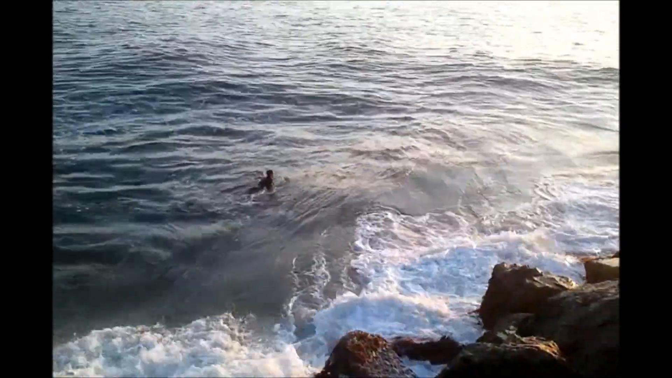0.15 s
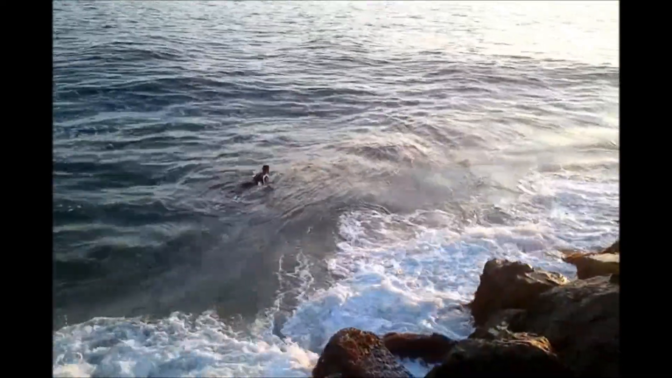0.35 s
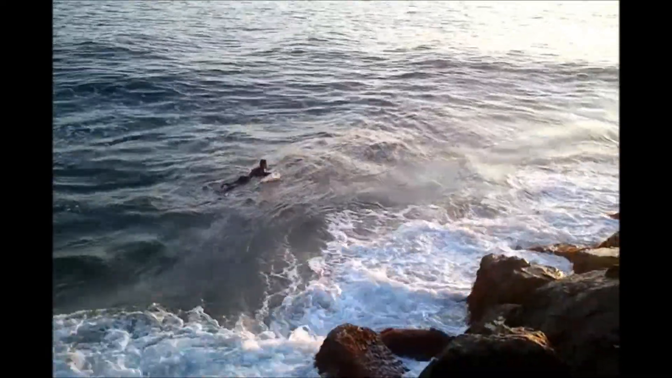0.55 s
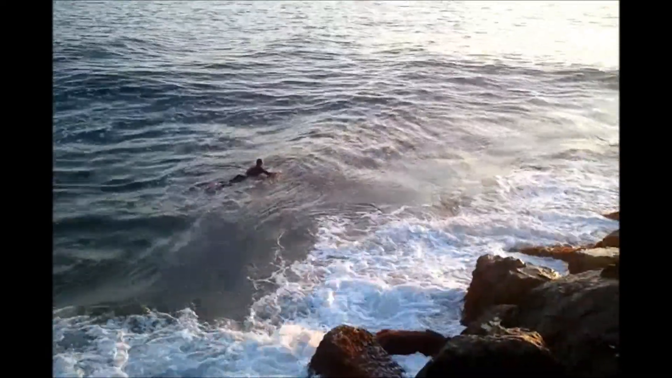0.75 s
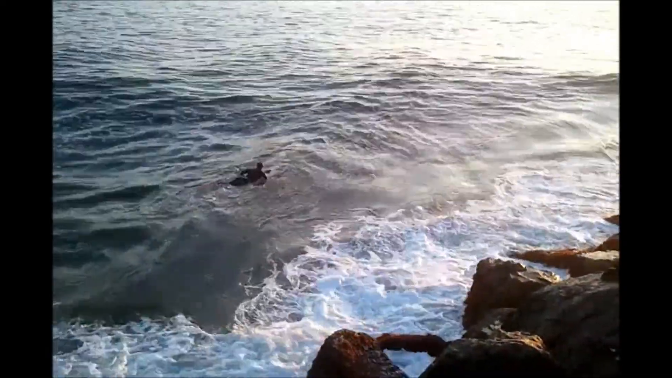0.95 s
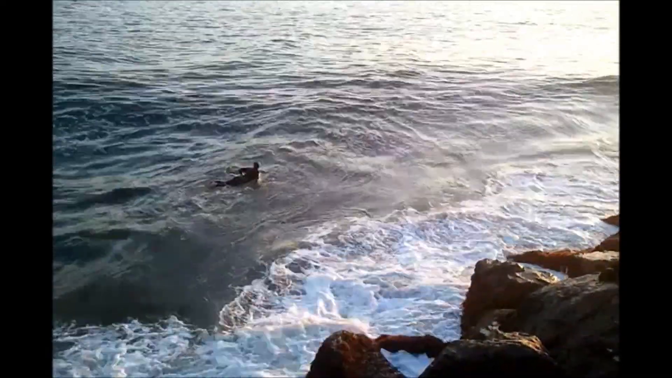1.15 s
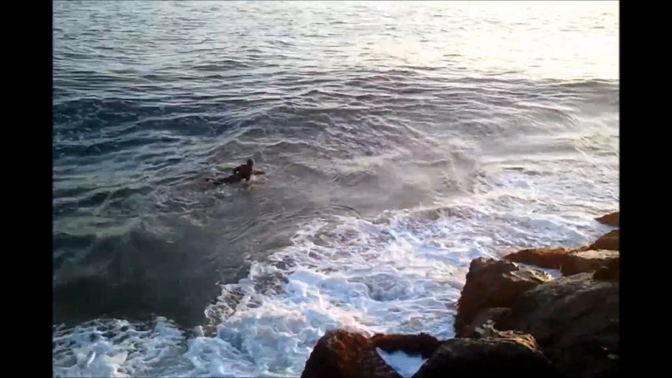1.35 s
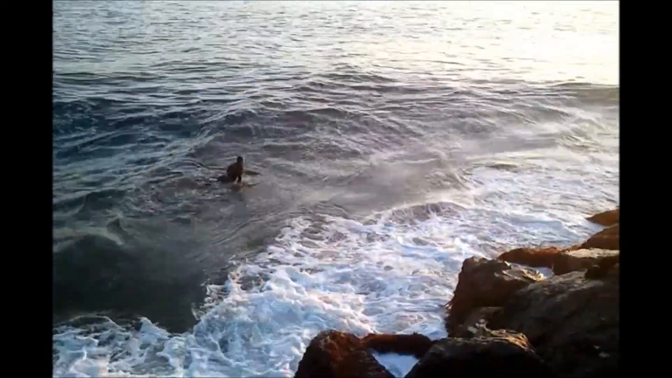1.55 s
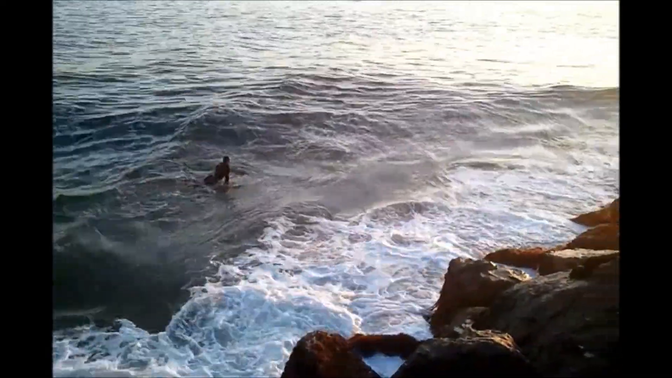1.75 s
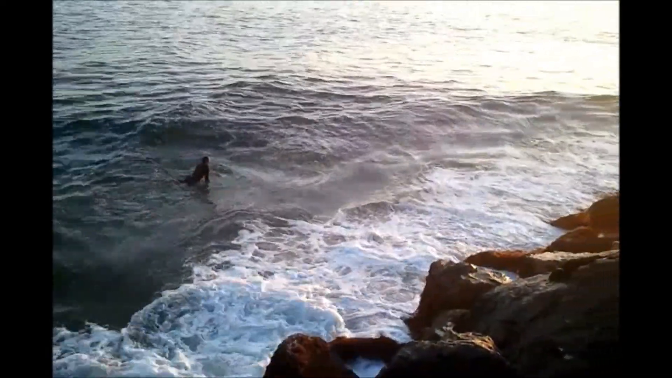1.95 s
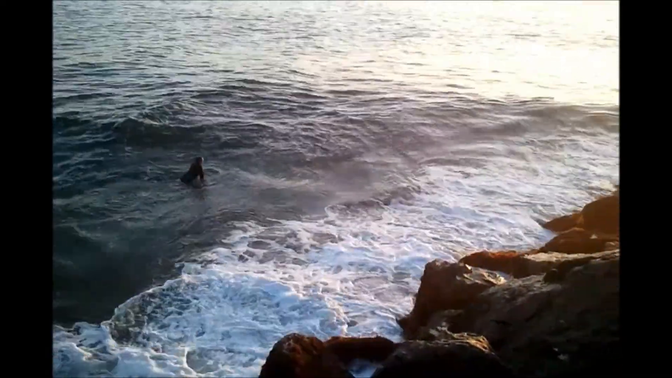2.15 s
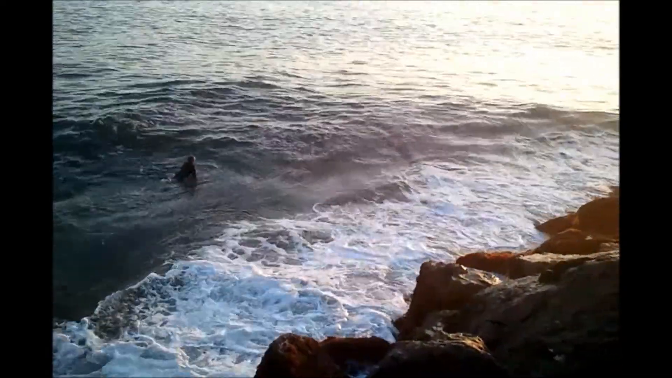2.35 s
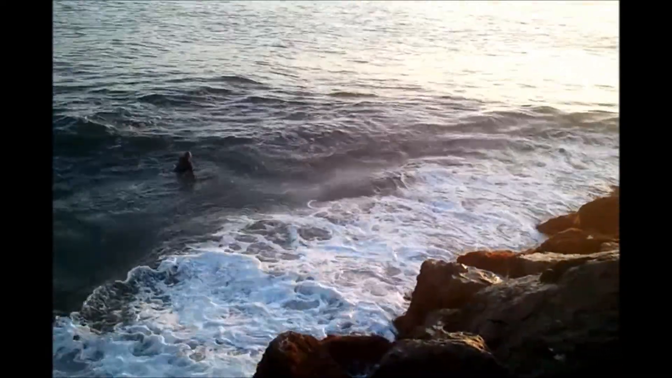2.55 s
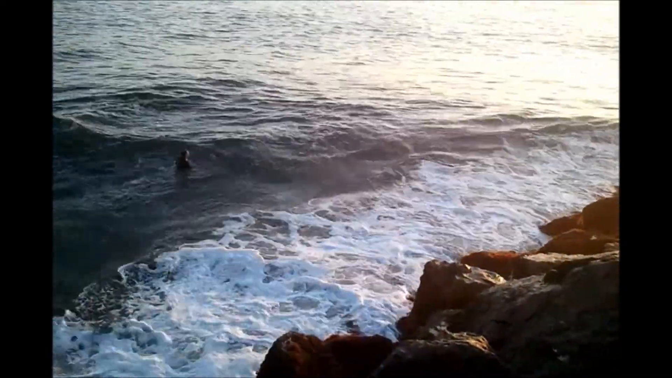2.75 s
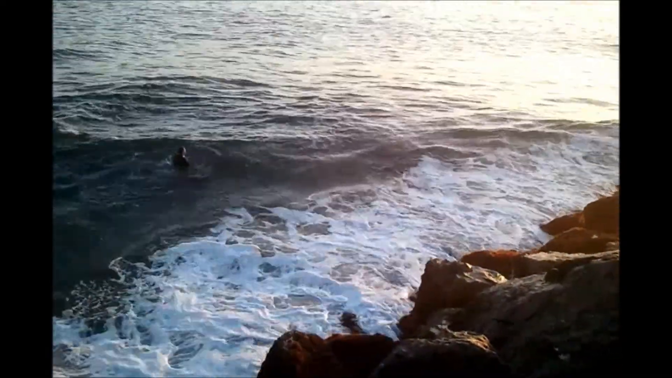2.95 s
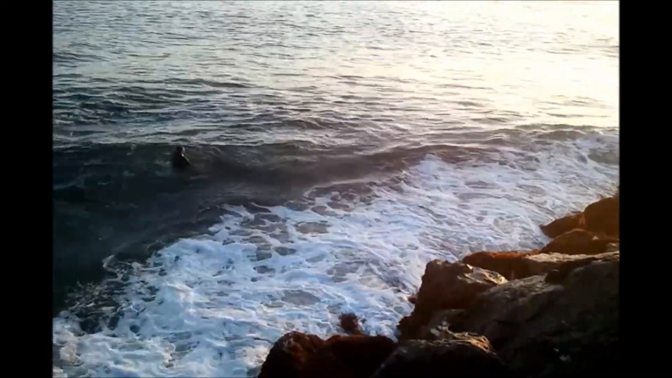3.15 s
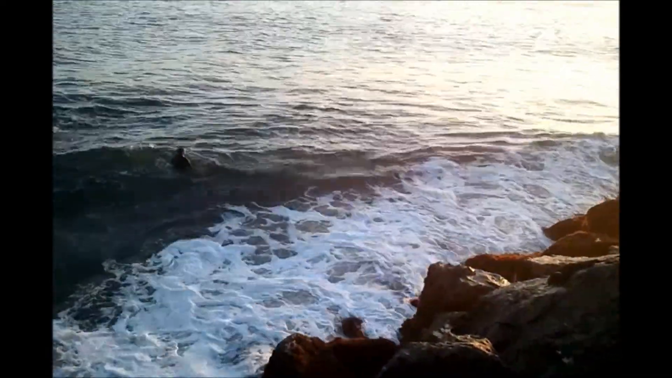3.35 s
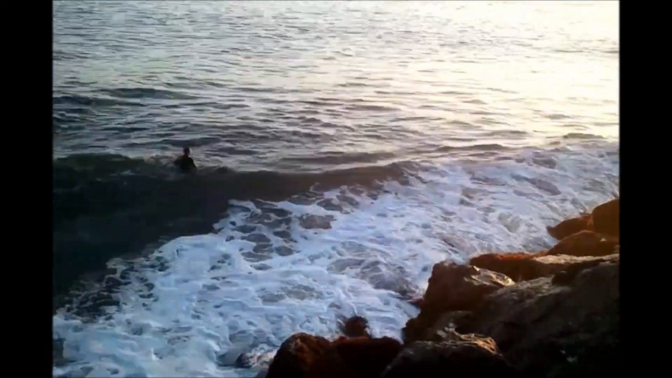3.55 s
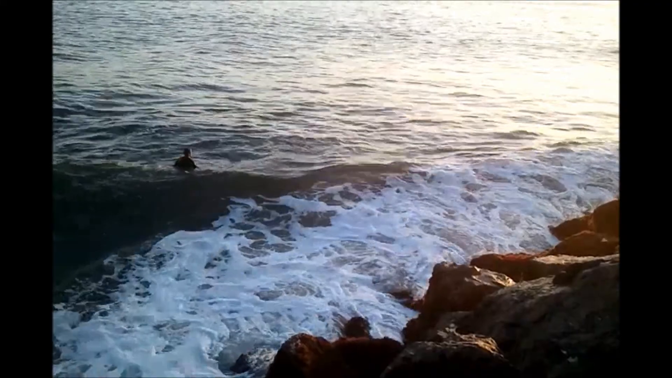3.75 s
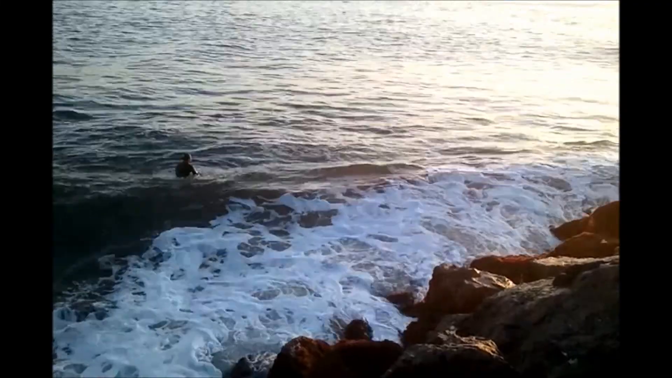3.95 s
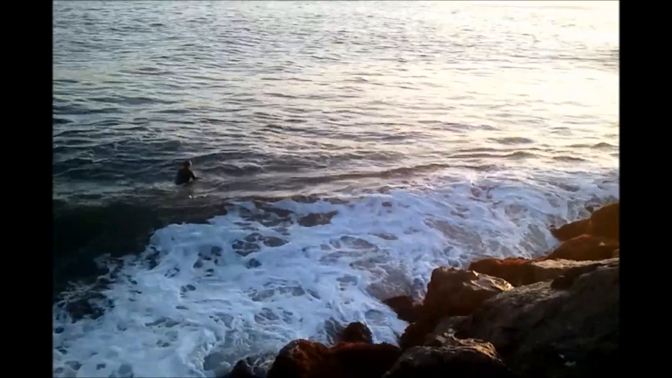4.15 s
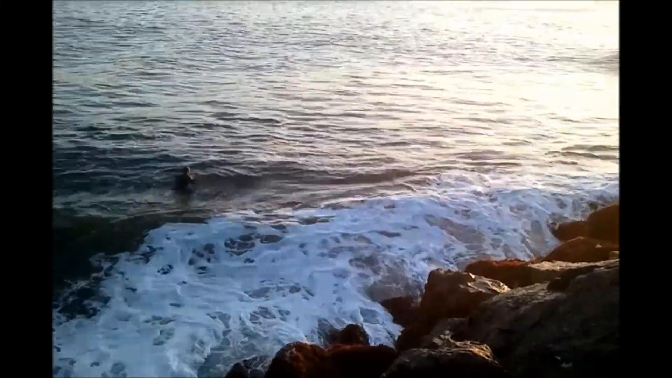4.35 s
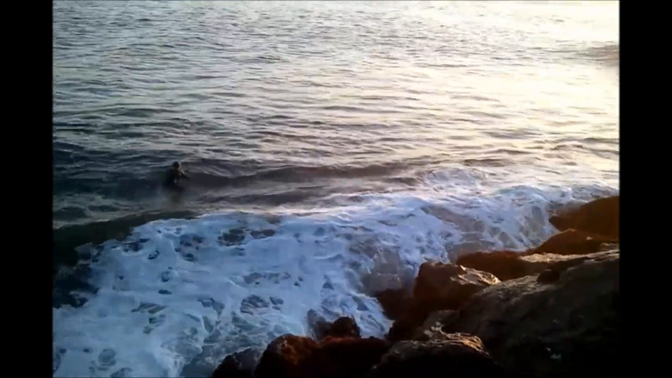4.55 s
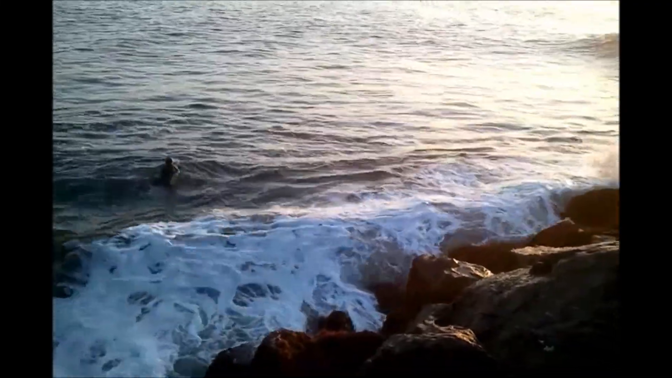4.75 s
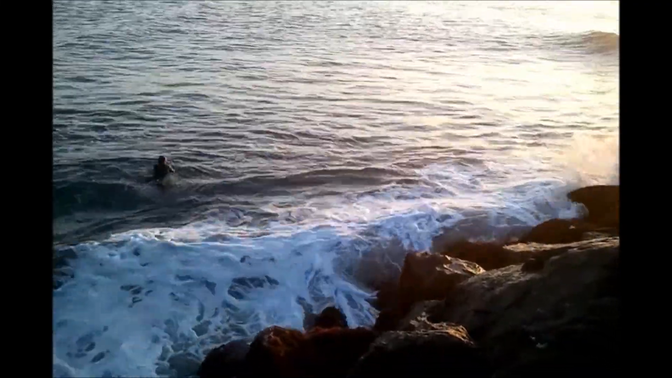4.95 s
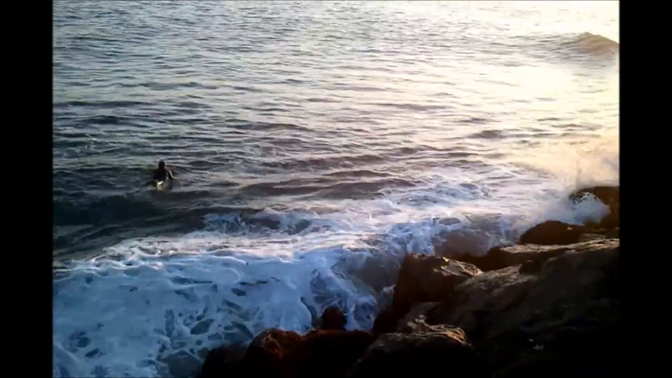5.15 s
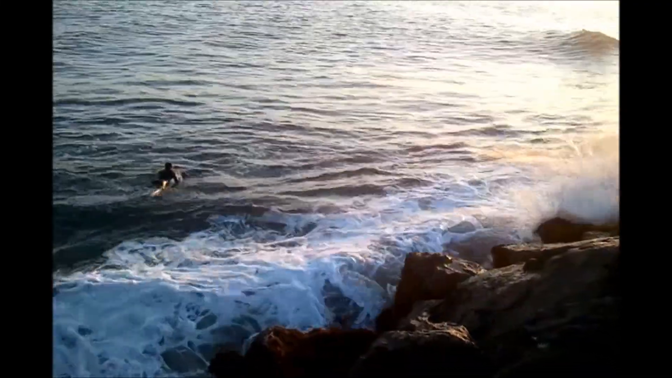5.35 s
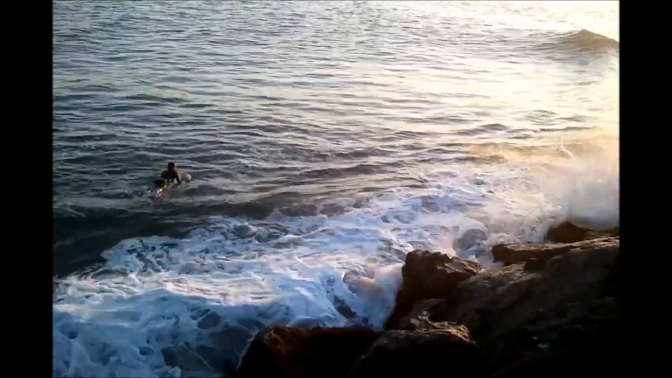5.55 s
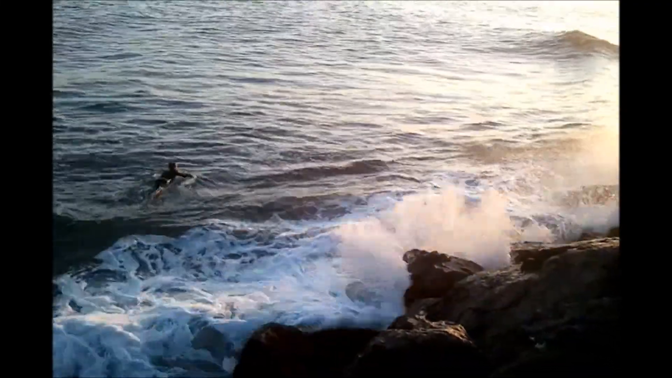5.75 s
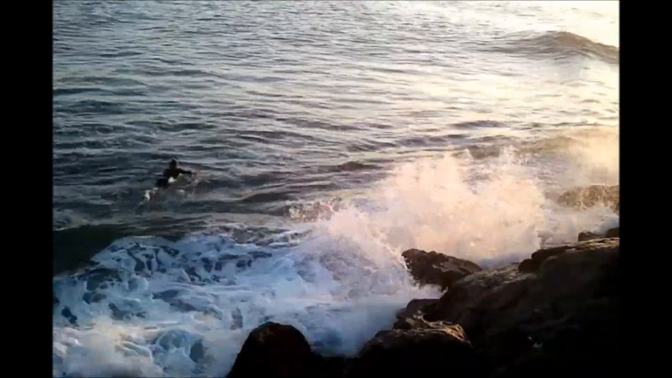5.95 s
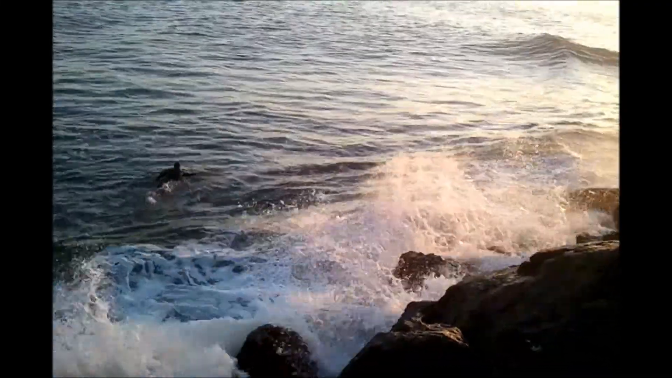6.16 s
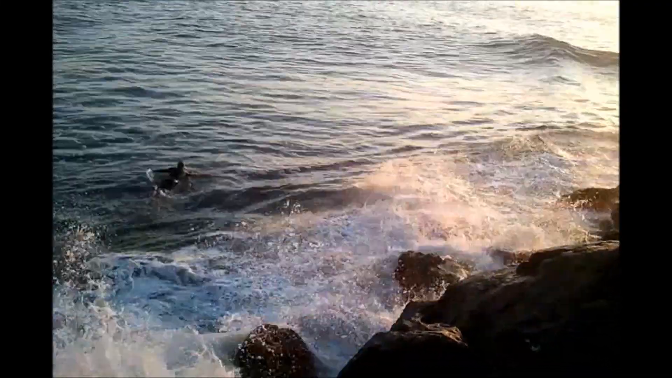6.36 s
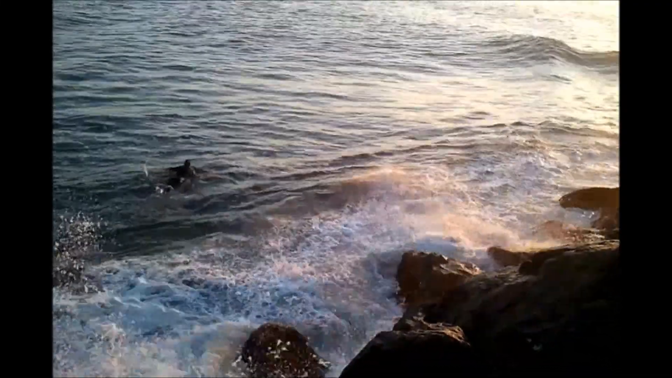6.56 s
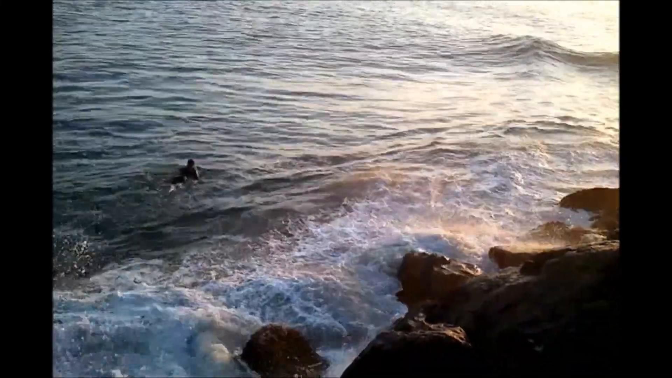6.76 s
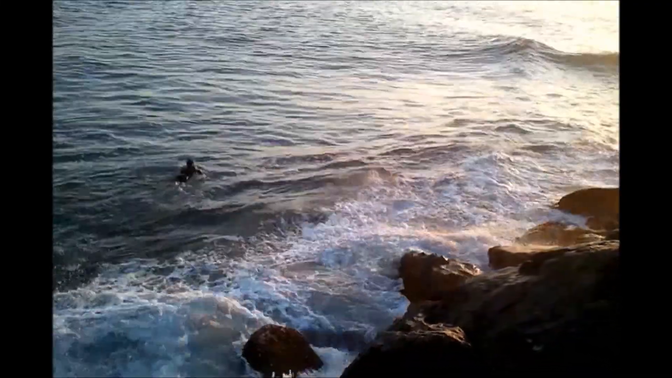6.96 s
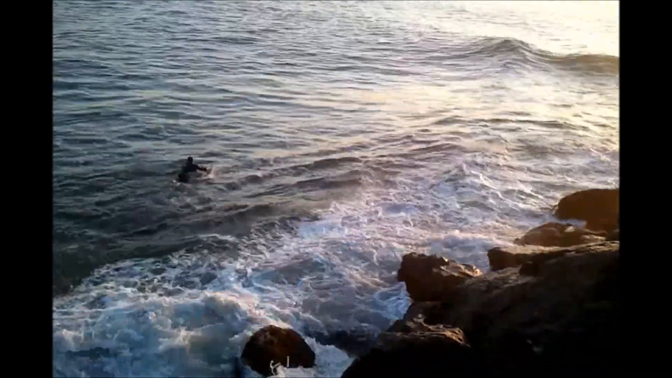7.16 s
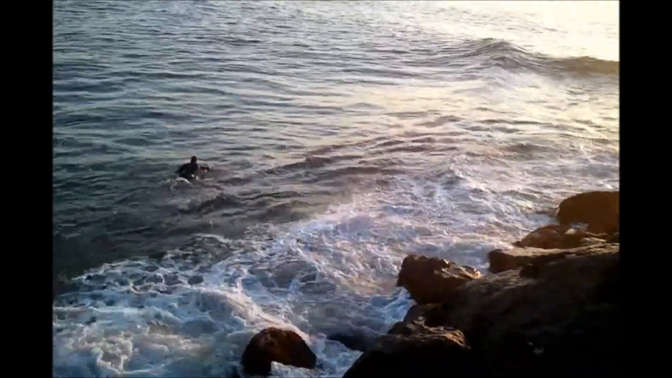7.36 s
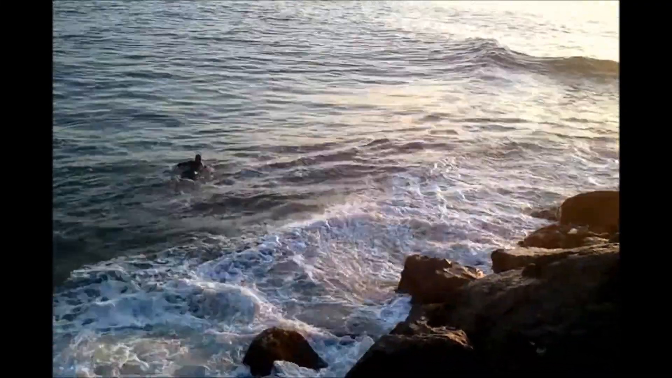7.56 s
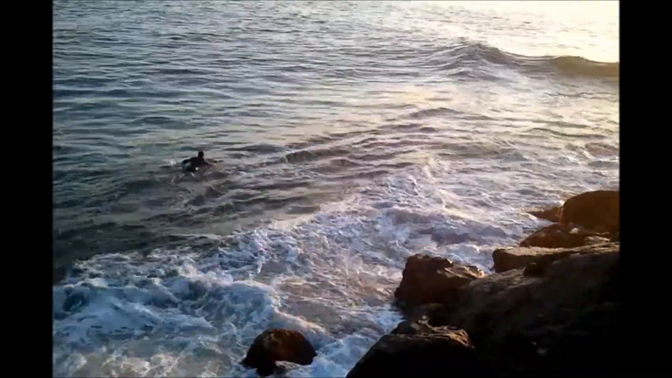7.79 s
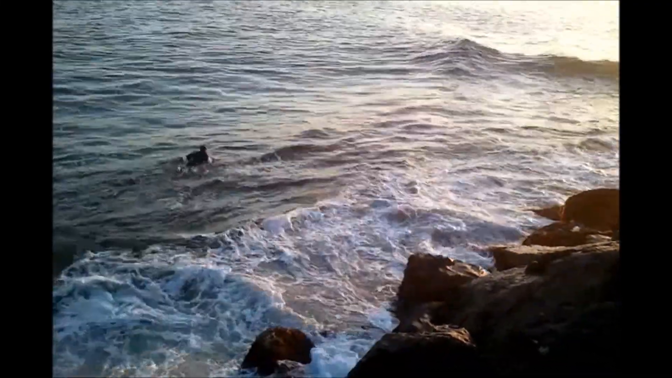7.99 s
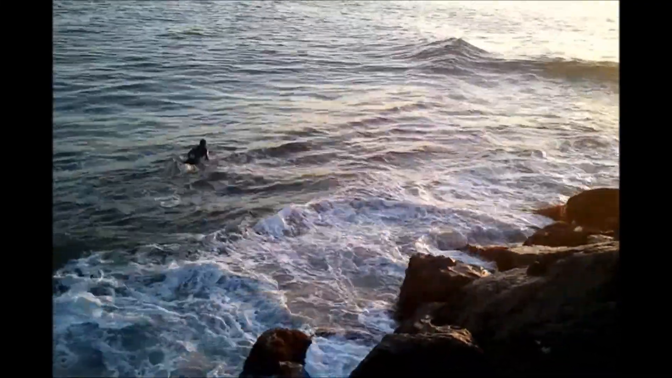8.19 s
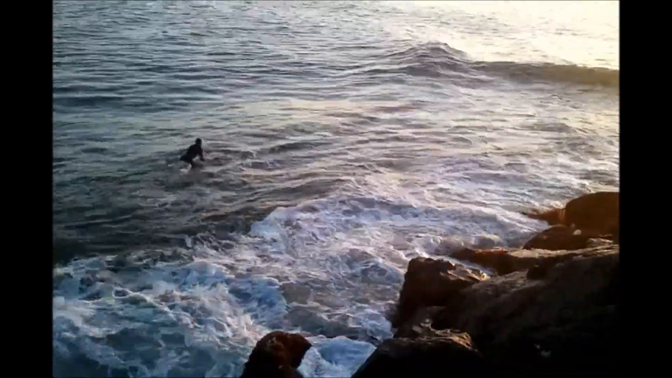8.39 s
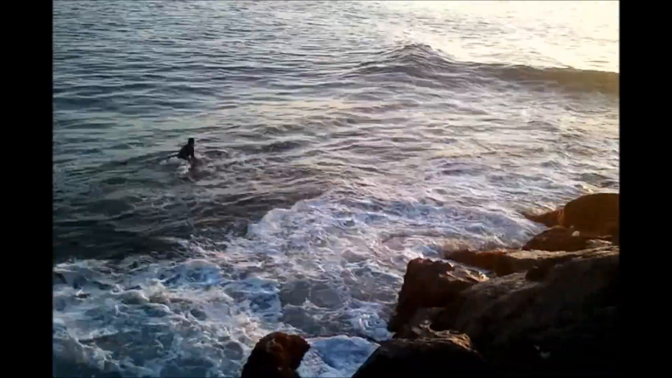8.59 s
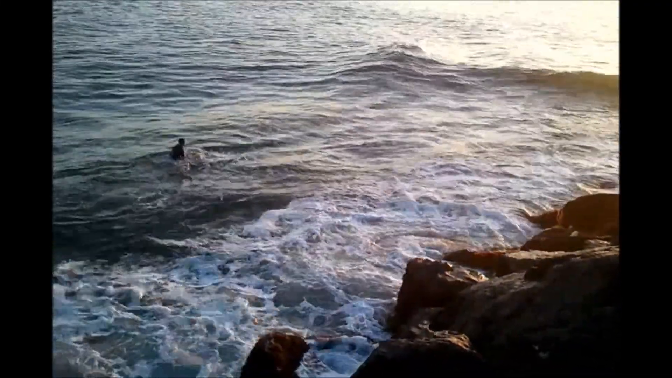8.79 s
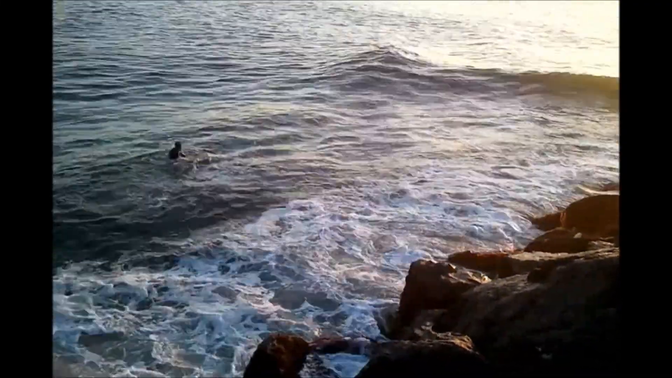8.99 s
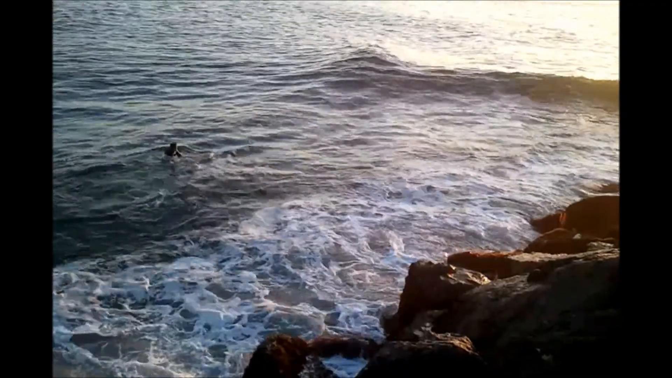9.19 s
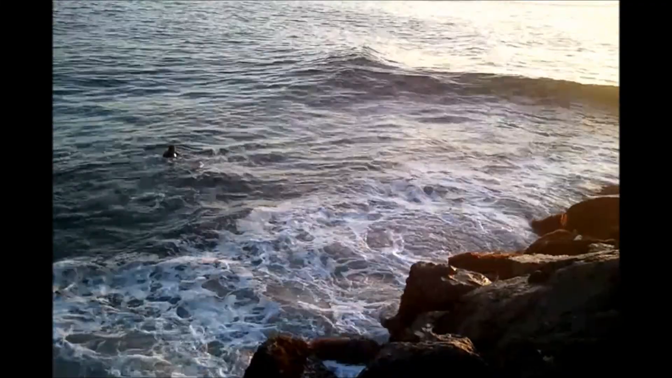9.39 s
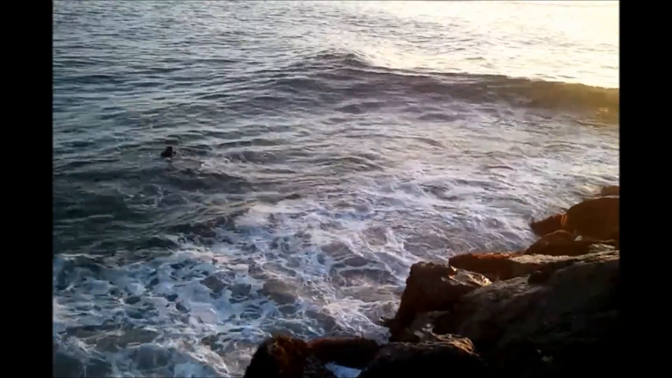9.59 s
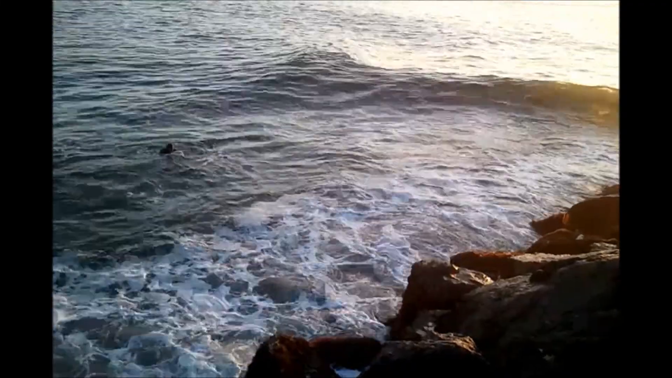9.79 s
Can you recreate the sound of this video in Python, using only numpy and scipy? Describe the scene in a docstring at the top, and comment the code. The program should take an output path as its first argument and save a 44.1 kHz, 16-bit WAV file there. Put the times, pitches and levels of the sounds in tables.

```python
"""Surf on a rock jetty

Heard from above: one wave drains away, then the next breaks and showers the boulders.
The whitewater is hiss mixed with bursting bubbles, made louder and softer by each mass of water.
Water thumps into gaps between the rocks: trapped air rings low and rebounds, ever weaker and lower.
Falling spray smacks on the stone with bright ticks and short, hollow clicks."""
import sys
import numpy as np
from scipy import signal
from scipy.io import wavfile
from scipy.ndimage import uniform_filter1d

SR = 44100
rng = np.random.default_rng(int(sys.argv[2]) if len(sys.argv) > 2 else 0)


def unload_audio(sound):
    """Save the sound as a 16-bit wav file, at the path given as the first command line argument."""
    columns = np.transpose(np.atleast_2d(sound))
    # keep every value between -1 and 1, then stretch to whole-number steps
    steps = np.round(np.clip(columns, -1, 1) * 32767)
    wavfile.write(sys.argv[1], SR, steps.astype(np.int16))


N = 433503  # length of the scene in samples
EDGE_HZ = 7950  # upper edge of the treble
FRAME, HOP = 1024, 256  # length and spacing of the spectrum frames, in samples


def gain_of(db):
    """Turns decibels into amplitude."""
    return 10 ** (np.asarray(db) / 20)


def evened(x):
    """Scales a signal to an rms (average strength) of one."""
    return x / np.sqrt(np.mean(x ** 2) + 1e-20)


def read(points, hz):
    """Joins (f/Hz, value) points by straight lines on a log-frequency axis."""
    f, value = np.transpose(points)
    return np.interp(np.log(hz + 1), np.log(f + 1), value)


def drift(shape, time_size, band_size):
    """Makes a smooth random field over (frequency bins, frames), with an rms of one."""
    field = rng.standard_normal(shape)
    field = uniform_filter1d(field, band_size, axis=0)
    field = uniform_filter1d(field, time_size, axis=1)
    return evened(field)


def swell(age, rise_s, hold_s, fade_db_per_s):
    """Power of a mass of water: it builds up, holds and dies away."""
    rise = np.clip(age / max(rise_s, 1e-3), 0, 1)
    fade = gain_of(-fade_db_per_s * np.maximum(age - rise_s - hold_s, 0))
    return rise ** 2 * fade ** 2


# All levels in these tables are relative: surf() sets the final loudness.
# steady wash of foam between waves: (f/Hz, level/dB)
STEADY_WASH = [(55, -22.5), (115, -25), (300, -25.5), (780, -27), (2000, -30.5), (4600, -29), (7000, -28)]
# waves breaking on the jetty:
# (start t/s, level/dB at the pivot pitch, rise/s, hold/s, basic fade/(dB/s), brightness/(dB/octave))
BREAKING_WAVES = [(-.25, -16.5, .42, 0.11, 21, 0.5), (0.393, -18.5, .12, .07, 9.5, 0.1),
                  (1.25, -24.5, .23, 0.022, 10, -.6), (4.46, -39, .31, .42, 2.8, 5),
                  (5.268, -23.5, 0.47, 0.61, 9, .5), (5.996, -22, .05, .34, 10.5, -0.5),
                  (6.332, -17, .29, 0.58, 7, 0.89)]
TILT_PIVOT_HZ = 1000
# boom and fizz die sooner than the churn: (f/Hz, factor on the fade of a breaking wave)
FADE_FACTORS = [(115, 1.3), (300, 0.91), (2000, 0.92), (4600, 1.44)]
# smaller masses of water, low where they surge into a gap, high where they fall as spray:
# (start t/s, time until the fade/s, level/dB, centre f/Hz)
SMALL_SLOSHES = [(-.05, 0.42, -21.5, 380), (.09, 0.23, -19, 1910), (0.469, 0.18, -21.5, 2010),
                 (1.429, .19, -28, 3500), (2.07, .6, -30, 930), (3.052, .5, -26, 1970),
                 (3.9, .45, -20.5, 49.5), (4.21, .19, -28.5, 7500), (5.039, 0.36, -29.5, 2190),
                 (5.58, .39, -17.3, 80), (6.449, 0.19, -14.5, 259), (6.649, .55, -20.5, 1690),
                 (7.412, 0.15, -18.5, 5400), (8.107, .19, -23, 7830), (8.52, .44, -24.5, 1150),
                 (9.21, .19, -22.5, 80.2), (9.41, .35, -35.5, 2300)]
SLOSH_RISE_S, SLOSH_FADE_DB_PER_S, SLOSH_OCTAVES = 0.11, 79, 0.93


def sea_level(hz, t):
    """Level in dB over (Hz, s): the powers of the steady wash, breaks and sloshes add up."""
    hz = np.maximum(hz, 20)[:, None]
    power = gain_of(read(STEADY_WASH, hz)) ** 2 * np.ones(len(t))
    for s, db, rise_s, hold_s, fade, tilt in BREAKING_WAVES:
        colour = gain_of(db + tilt * np.log2(hz / TILT_PIVOT_HZ)) ** 2
        power += colour * swell(t - s, rise_s, hold_s, fade * read(FADE_FACTORS, hz))
    for s, length, db, centre_hz in SMALL_SLOSHES:
        hump = np.exp(-.5 * (np.log2(hz / centre_hz) / SLOSH_OCTAVES) ** 2)
        hold_s = length - SLOSH_RISE_S
        power += gain_of(db) ** 2 * hump * swell(t - s, SLOSH_RISE_S, hold_s, SLOSH_FADE_DB_PER_S)
    return 10 * np.log10(power)


def ring(hz, cycles, glide=0., onset=0.2):
    """A pocket of air rings for a few cycles; its pitch glides as it changes size."""
    turns = np.arange(int(7 * cycles * SR / hz) + 2) * hz / SR
    swing = np.sin(2 * np.pi * turns * (1 + glide * np.tanh(turns / cycles / 2)))
    wave = swing * np.exp(-turns / cycles) * (1 - np.exp(-turns / onset))
    return wave / abs(wave).max()


def bubbles(low_hz, high_hz, per_s, cycles, spread_db, count):
    """Bubbles of many sizes burst at random, a few much louder than the rest; even power per Hz."""
    out = np.zeros(N)
    pitches = np.geomspace(low_hz, high_hz, count)
    each = int(per_s * N / SR / count) + 1
    for hz, width in zip(pitches, np.gradient(pitches)):
        when, luck, sign = rng.random((each, 3)).T
        loudness = gain_of(spread_db * np.minimum(-np.log(1 - luck), 4.5))
        bursts = np.bincount((when * N).astype(int), loudness * np.sign(sign - .5), N)
        ringing = signal.oaconvolve(bursts, ring(hz, cycles, glide=0.051))[:N]
        # a wider share of the spectrum gets more power
        out += np.sqrt(2 * width / SR) * evened(ringing)
    return out


def whitewater(merging=0.21, splash_hz=2000.):
    """Countless far bubbles merge to a hiss; near ones gulp, splatter and crackle out of it."""
    hiss = rng.standard_normal(N)
    gulps = bubbles(92.6, 707, per_s=200, cycles=0.91, spread_db=3.0, count=8)
    splatter = bubbles(589, 3025, per_s=800, cycles=3.0, spread_db=2.5, count=14)
    crackle = bubbles(2400, 7800, per_s=1300, cycles=0.82, spread_db=2.5, count=8)
    near = gain_of(-5.5) * gulps + gain_of(-5) * splatter + gain_of(-5) * crackle
    # in the roar of a break single bubbles drown; in the backwash they stand out
    t = np.arange(0, N, HOP) / SR
    splash_db = sea_level(np.array([splash_hz]), t)[0]
    louder_db = np.interp(np.arange(N) / SR, t, splash_db - splash_db.mean())
    clear = gain_of(-merging * louder_db)
    return (hiss + clear * near) / np.sqrt(1 + clear ** 2 / 2)


# colour of the whitewater: (f/Hz, relative level/dB per Hz)
WHITEWATER_COLOUR = [(25, -24), (80, -9), (150, -1.5), (280, 1), (400, -2), (570, -5.5), (820, -4.5),
                     (1100, -6), (1900, -2.5), (2700, -6.5), (3450, -12), (4400, -16.5), (6200, -13),
                     (7700, -19.5)]
# fine spray at the upper edge of the splash: (t/s, level change/dB)
SPRAY_LEVEL = [(0, -1.1), (1.4, -3.5), (2.6, 1.1), (3.5, -0.3), (4.3, 3), (6.4, 2.5), (8.2, -1.8),
               (9.0, .5), (9.8, 2.5)]
FINE_SPRAY_HZ, FINE_SPRAY_OCTAVES = 3250, 0.22
# the rock face reflects the surf a moment later, by a path that changes as the wave rolls in:
# (t/s, delay/ms, strength 0-1)
ROCK_REFLECTION = [(0, 3.0, .13), (.8, 2.9, 0), (1.4, 2.0, 0.1), (2.8, 1.3, 0), (3.4, 1.3, 0.06),
                   (3.9, 1.1, 0.06), (5.0, 1.02, 0.12), (5.7, 1.02, 0.13), (6.5, 1.03, 0.02)]
SURF_DB = -19.5  # rms level of the whole surf


def surf(patchy_db=0.68, flicker_db=0.26, surge_db=0.6):
    """The whitewater swells with each break and slosh, then drains back to a steady wash."""
    hz, t, z = signal.stft(whitewater(), SR, nperseg=FRAME, noverlap=FRAME - HOP)
    # flatten the average spectrum before colouring it
    average_power = uniform_filter1d(np.mean(abs(z) ** 2, axis=1), size=9)
    z = z / np.sqrt(average_power)[:, None]
    field_db = read(WHITEWATER_COLOUR, hz)[:, None] + sea_level(np.minimum(hz, EDGE_HZ), t)
    # fine spray raises or lowers a hump at the upper edge of the splash
    hump = np.exp(-.5 * (np.log2((hz + 1) / FINE_SPRAY_HZ) / FINE_SPRAY_OCTAVES) ** 2)
    field_db = field_db + np.outer(hump, np.interp(t, *np.transpose(SPRAY_LEVEL)))
    # single splashes change a patch of the spectrum; sheets of spray change wide bands of it
    field_db = field_db + patchy_db * drift(z.shape, time_size=14, band_size=14)
    field_db = field_db + flicker_db * drift(z.shape, time_size=4, band_size=110)
    field_db = field_db + surge_db * drift(z.shape, time_size=20, band_size=130)
    # direct and reflected sound interfere in a slowly sweeping comb
    s, *path = np.transpose(ROCK_REFLECTION)
    delay_ms, strength = (np.interp(t, s, column) for column in path)
    comb = 1 + strength * np.exp(-2j * np.pi * np.outer(hz, delay_ms) / 1000)
    shaped = z * gain_of(field_db) * comb
    wash = signal.istft(shaped, SR, nperseg=FRAME, noverlap=FRAME - HOP)[1][:N]
    return gain_of(SURF_DB) * evened(wash)


def add(mix, s, sound):
    """Mixes a sound in at time s."""
    part = mix[max(round(s * SR), 0):][:len(sound)]
    part += sound[:len(part)]


def rocks(x, t60, echo_db):
    """Nearby boulders scatter a short spray of echoes, which fade by 60 dB in t60 seconds."""
    t = np.arange(SR // 5) / SR
    taps = rng.standard_normal(len(t)) * (rng.random(len(t)) < 2000 / SR)  # about 2000 echoes per s
    taps = taps * np.exp(-np.log(1000) * t / t60) * (t > .002)
    echoes = signal.oaconvolve(x, taps / np.linalg.norm(taps))[:N]
    return x + gain_of(echo_db) * echoes


# air pockets slammed shut between boulders:
# (t/s, level/dB of the first ring, starting f/Hz of the first ring, strength of each rebound 0-1)
AIR_POCKETS = [(1.396, -17, 210, .45), (1.410, -6.5, 400, 0.55), (1.439, -7, 280, 0.05),
               (1.699, -13.5, 254, 0.3), (2.7627, -3.5, 450, .55), (2.832, -9.5, 310, 0.32),
               (3.032, -12, 210, 0.04), (3.111, -18, 170, .3), (5.131, -10, 220, 0), (5.737, -14, 200, 0.2),
               (5.824, -12, 190, .1), (5.848, -7.5, 380, 0.3), (5.931, -12, 190, .1), (6.041, -9, 324, .2),
               (6.596, -8.5, 262, 0.3), (6.772, -7, 383, 0.1), (9.318, -16, 201, 0), (9.39, -17, 170, 0.1)]
REBOUND_S = 0.0085  # time from one ring to the next


def thumps(cycles=0.72, glide=-0.39, low_cut_hz=75, sag=0.83, slap_db=-12, slap_hz=650, count=3):
    """Water slaps shut on trapped air, which swings and rebounds, each time weaker and lower."""
    out = np.zeros(N)
    for s, db, hz, rebound in AIR_POCKETS:
        add(out, s, gain_of(db + slap_db) * ring(slap_hz, cycles=0.62))
        for k in range(count):
            air = ring(hz * sag ** k, cycles, glide, onset=0.22)
            add(out, s + k * REBOUND_S, gain_of(db) * rebound ** k * air)
    # little deep bass
    out = signal.sosfilt(signal.butter(2, low_cut_hz, "high", fs=SR, output="sos"), out)
    return rocks(out, t60=0.065, echo_db=-8)


# lumps of spray landing on stone and pools:
# (t/s, relative level/dB, f/Hz of the click, ring/cycles)
SPRAY_LUMPS = [(1.601, -7, 1990, 1.5), (7.653, -2, 2600, 0.77), (7.806, -3, 2200, 1.3),
               (8.080, -2.5, 1820, 2.1), (8.131, -9, 2800, 2), (8.209, -8, 2510, 2.6),
               (8.246, -8, 5500, 1.2), (8.2864, 3, 1800, 1.2), (8.327, -3, 2030, 1.7),
               (8.505, -5.5, 5840, 1.1), (8.702, -5, 2000, 1.2), (9.555, -11.5, 3200, .9),
               (9.609, -5, 970, 1.3), (9.7525, -9, 2000, 1.1)]


def smacks(level_db=-4.0, tick_db=-11, tick_hz=3700):
    """Each lump of water lands with a bright tick and a short, hollow click."""
    out = np.zeros(N)
    for s, db, hz, cycles in SPRAY_LUMPS:
        add(out, s, gain_of(db + level_db) * ring(hz, cycles, glide=0.051, onset=0.58))
        add(out, s, gain_of(db + tick_db) * ring(tick_hz, cycles=0.94))
    return rocks(out, t60=.04, echo_db=-9)


def scene():
    """The whole shore arrives alike in both channels."""
    shore = surf() + thumps() + smacks()
    return np.array([shore, shore])


def record(dry, low_cut_hz=45):
    """A small microphone loses the deepest bass; a narrow-band recorder cuts the top treble."""
    thin = signal.sosfilt(signal.butter(2, low_cut_hz, "high", fs=SR, output="sos"), dry)
    treble_cut = signal.firwin(241, EDGE_HZ, window=("kaiser", 8), fs=SR)
    return signal.oaconvolve(thin, treble_cut[None], "same")


dry = scene()
out = record(dry)
unload_audio(out)
```